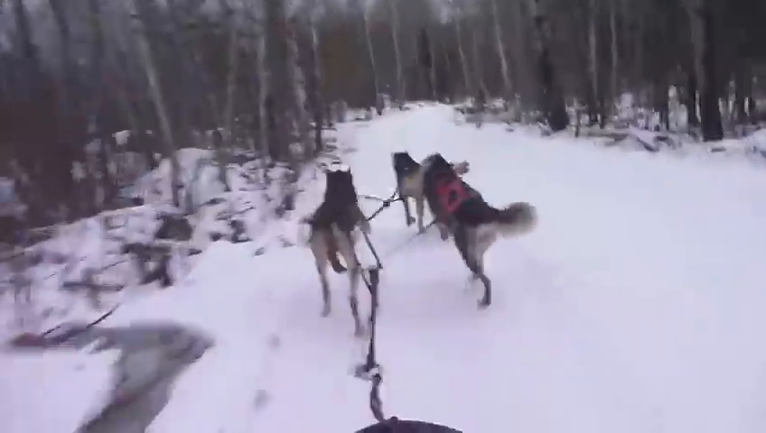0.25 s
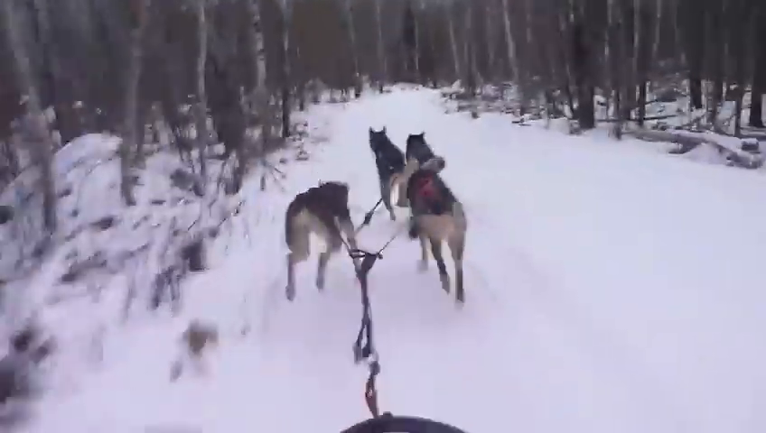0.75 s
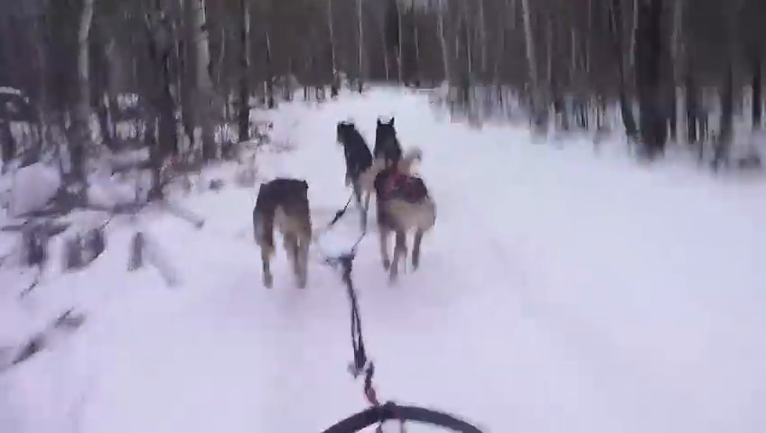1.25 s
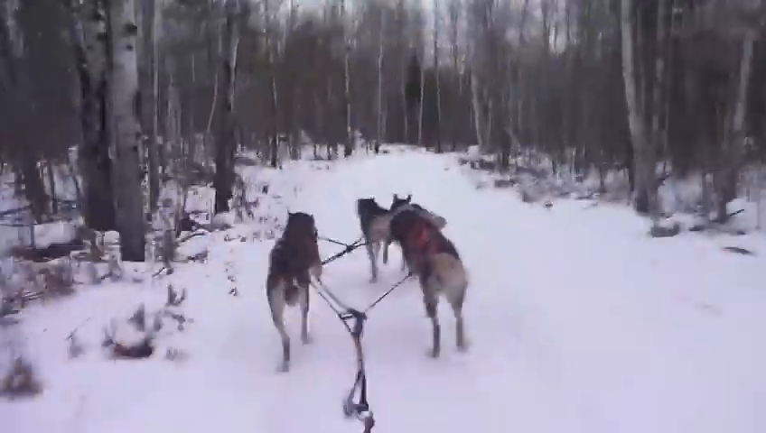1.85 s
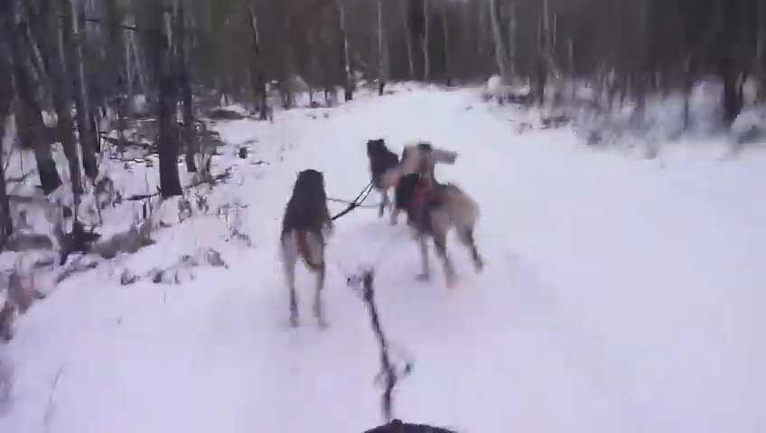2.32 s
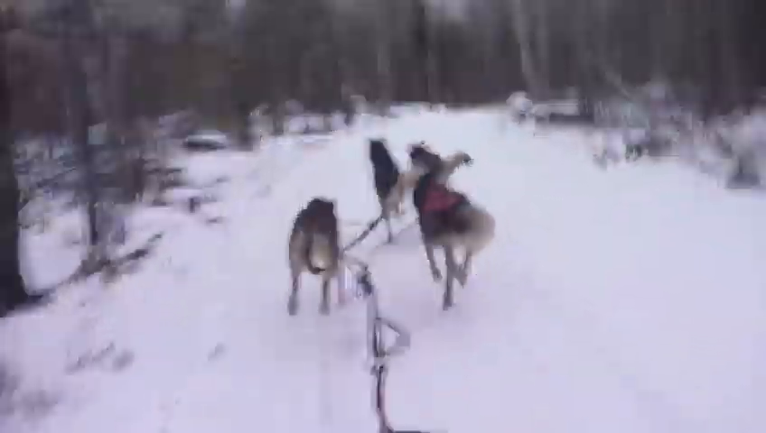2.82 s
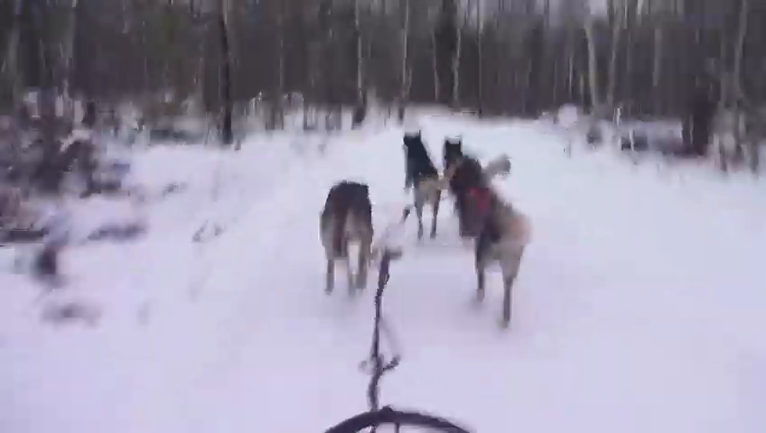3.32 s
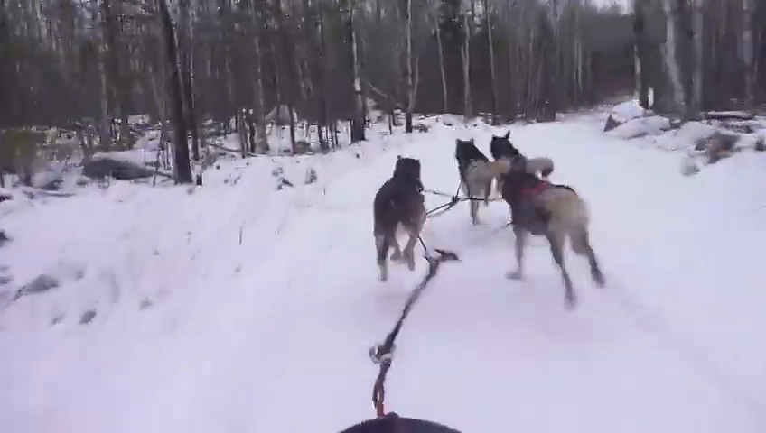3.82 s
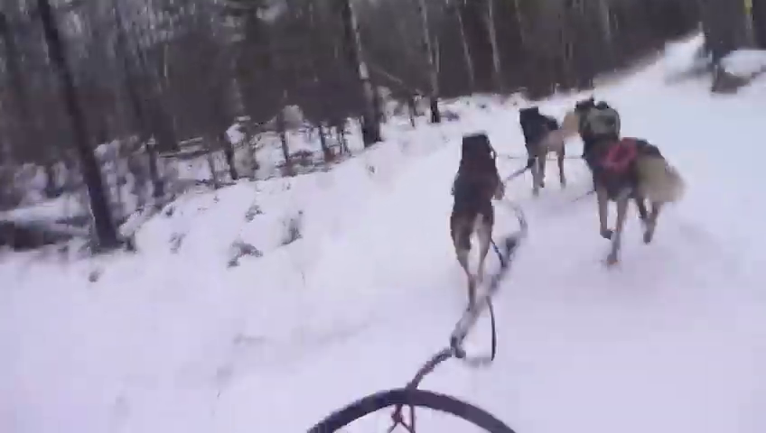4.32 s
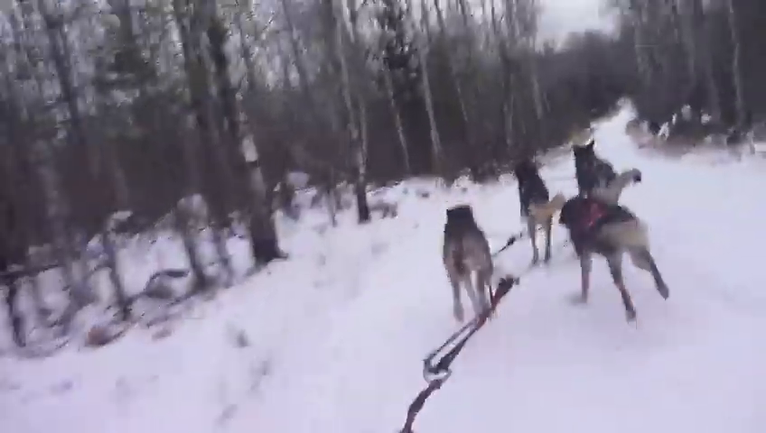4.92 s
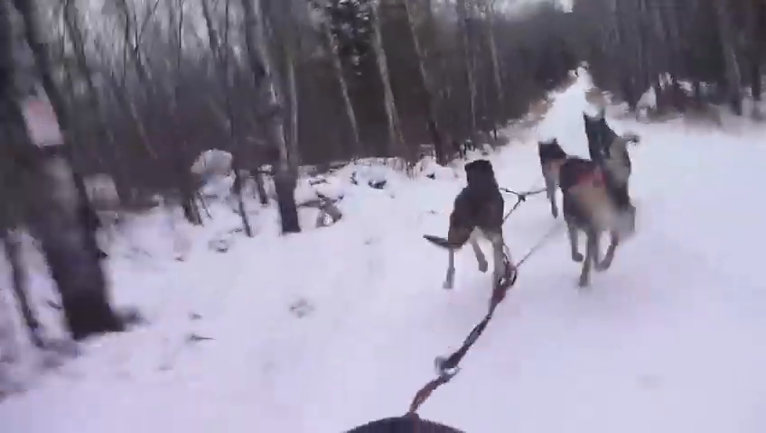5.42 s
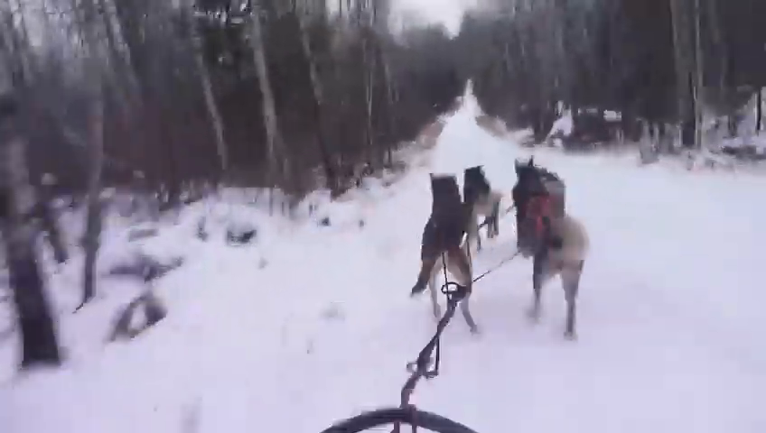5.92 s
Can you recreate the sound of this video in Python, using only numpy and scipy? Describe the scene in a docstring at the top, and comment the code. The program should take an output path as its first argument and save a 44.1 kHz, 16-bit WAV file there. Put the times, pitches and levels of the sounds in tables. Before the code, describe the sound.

Close, dry clatter of a jolting dog-drawn rig: hard knocks, fine rattling and sharp metallic clicks above rolling rumble and faint snow hiss.

```python
"""Loose parts rattle and slam on a wheeled rig that dogs pull along a frozen, rutted snow trail.
Bumps slam the parts into their ringing modes; rough patches shake the rig and the rattle follows the shaking.
Wheels rumble and hiss over packed snow as coloured noise, and the frame thuds softly in short low waves.
Light parts ring on as single fading notes, and small metal fittings click as short high pings.
The camera rides on the frame, so everything is close, dry and mono."""
import sys
import numpy as np
from scipy import signal
from scipy.fft import rfft, irfft
from scipy.io import wavfile
from scipy.ndimage import uniform_filter1d

SR = 44100
rng = np.random.default_rng(int(sys.argv[2]) if len(sys.argv) > 2 else 0)


def master_out(mix):
    """Clip the mix to full scale and print it as 16-bit PCM to the path in sys.argv[1]."""
    frames = np.transpose(np.atleast_2d(mix))
    ceiling = np.clip(frames, -1, 1)
    pcm = np.round(ceiling * 32767).astype(np.int16)
    wavfile.write(sys.argv[1], SR, pcm)


N = 271656
TIME = np.arange(N) / SR
TOP_HZ = 7650  # upper edge of the camera's sound

# Bumps of the trail, hard and light.
# Each row: time of the slam's peak [s], clack level [dB], frame thump relative to the clack [dB].
BUMPS = [(0.02, -13.5, 0), (0.081, -26.5, 5.5), (0.126, -22, 0), (0.161, -17, 1), (0.27, -21.5, 3.5),
         (0.442, -30, -11), (0.577, -27.5, 6.5), (0.623, -31, -22), (0.658, -24.5, -2), (0.673, -22, 5),
         (0.734, -15.5, 0), (0.871, -21.5, -5), (0.93, -18, -4), (1.146, -23.5, -10), (1.241, -16, 0),
         (1.29, -27.5, 4.5), (1.456, -25, 1), (1.479, -14, 1), (1.536, -19, 0), (1.73, -29.5, -4.5),
         (1.855, -14.5, 0), (2.068, -31, 3), (2.101, -18, -2), (2.199, -22, 1), (2.232, -14, -1.5),
         (2.402, -17, 3), (2.553, -18.5, 0.5), (2.628, -20.5, -3), (2.725, -17, 0.5), (2.854, -22, -4),
         (2.904, -20, 1.5), (3.074, -26, 1), (3.208, -21, 1.5), (3.341, -15, -0.5), (3.516, -20.5, 2),
         (3.634, -28, -8), (3.962, -17, -2), (4.074, -23, 1), (4.087, -25, -10), (4.33, -27, 0),
         (4.353, -28.5, -11), (4.524, -16, 0), (4.641, -20, 0.5), (4.956, -18.5, 0.5), (5.106, -18, -2),
         (5.155, -25, -9), (5.21, -16, 1), (5.428, -28.5, 0), (5.468, -15.5, -2), (5.565, -21, 1.5),
         (5.681, -24.5, 0), (5.71, -14, -0.5), (5.88, -20, -4.5), (5.913, -13.5, -3), (6.083, -20.5, -2),
         (6.135, -23, 1)]


def undb(db):
    """Decibels to gain."""
    return 10 ** (np.asarray(db) / 20)


def unit(x):
    """Scale to rms 1."""
    return x / np.sqrt(np.mean(x ** 2) + 1e-18)


def curve(rows):
    """Join (seconds, value) rows by straight lines."""
    return np.interp(TIME, *np.transpose(rows))


def add(out, s, x):
    """Mix x into out, starting at s seconds."""
    i = max(int(s * SR), 0)
    out[i:i + len(x)] += x[:max(N - i, 0)]


def band(x, lo_hz, hi_hz, order=2):
    """Causal band-pass."""
    sos = signal.butter(order, [lo_hz, hi_hz], "band", fs=SR, output="sos")
    return signal.sosfilt(sos, x)


def coloured(points):
    """Noise of rms 1 whose spectrum follows (Hz, dB) points."""
    hz, db = np.transpose(points)
    bin_hz = np.arange(N // 2 + 1) * SR / N
    gain = undb(np.interp(np.log(bin_hz + 1), np.log(hz), db))
    return unit(irfft(rfft(rng.standard_normal(N)) * gain, N))


def walk(rate):
    """Random levels, rate of them per second, joined by ramps and scaled to rms 1."""
    hold = int(SR / rate)
    steps = np.repeat(rng.standard_normal(N // hold + 1), hold)
    return unit(uniform_filter1d(steps, hold)[:N])


def contacts(size, per_s, spread_db):
    """A random train of tiny impacts of uneven strength and either sign."""
    level_db = spread_db * np.clip(rng.standard_normal(size), -2, 2)
    strength = undb(level_db) * rng.choice([-1, 1], size)
    return strength * (rng.random(size) < per_s / SR)


def tap(t, decay_s, first=5):
    """One sharp contact, then a fading chatter of smaller ones."""
    push = unit(contacts(len(t), per_s=6000, spread_db=0.5)) * np.exp(-t / decay_s)
    push[0] = first
    return push


def ring(push, scatter_db, detune=0.057):
    """The damped modes of the loose parts; each point of contact favours and detunes different ones."""
    # Resonances of the loose parts before scatter and detuning.
    # Each row: frequency [Hz], width [Hz], level [dB].
    modes = [(960, 480, -2), (1343, 278, 5), (1580, 125, 1), (2002, 240, 2.5), (2522, 490, 3),
             (3200, 480, -1.5), (3800, 130, -13.5), (5170, 470, -4.5), (6800, 280, -49.5)]
    out = 0
    for (hz, width_hz, db), (favour, shift) in zip(modes, rng.standard_normal((len(modes), 2))):
        resonator = signal.iirpeak(hz * np.exp(detune * shift), hz / width_hz, SR)
        out = out + undb(db + scatter_db * favour) * signal.lfilter(*resonator, push)
    return out


def swell(start_s, length_s, attack_s, release_s):
    """Envelope that rises exponentially to 1, holds and fades exponentially."""
    before = np.maximum(start_s - TIME, 0)
    after = np.maximum(TIME - start_s - length_s, 0)
    return np.exp(-before / attack_s - after / release_s)


def shaking(patch_attack_s=0.0042, patch_release_s=0.0091,
            bump_db=-15, bump_attack_s=.014, bump_release_s=0.018):
    """How hard the rig is shaken, in dB: smooth snow, rough patches and bumps add their power."""
    # Smooth snow beneath the patches. Each row: time [s], shaking [dB].
    smooth_rows = [(0, -40.5), (1.3, -47.5), (1.66, -48.5), (2.0, -43.5), (2.8, -49.5), (3.8, -44.5),
                   (5.2, -42.5), (6.16, -40.5)]
    # Rough patches of the trail. Each row: start [s], length [s], shaking [dB].
    patch_rows = [(0.079, 0.054, -27), (0.325, 0.13, -34.0), (0.559, 0.13, -29.5), (0.866, 0.088, -35.5),
                  (1.015, 0.026, -28), (1.123, 0.065, -31), (1.29, 0.13, -37.0), (1.45, 0.12, -33.5),
                  (1.797, 0.086, -30.5), (2.181, 0.081, -32), (2.325, 0.045, -38.5), (2.492, 0.014, -30),
                  (2.573, 0.17, -35.5), (2.829, 0.089, -33), (2.99, 0.11, -39.5), (3.141, 0.14, -33.5),
                  (3.449, 0.086, -32.5), (3.627, 0.098, -38.5), (3.904, 0.2104, -36), (4.435, 0.11, -28),
                  (4.578, 0.08, -33.5), (4.899, 0.22, -38.5), (5.052, 0.19, -35.5), (5.362, 0.17, -37.5),
                  (5.633, 0.048, -36.5), (5.82, 0.12, -32.0), (6.075, 0.078, -37.5)]
    power = undb(curve(smooth_rows)) ** 2
    for s, length_s, db in patch_rows:
        power = power + (undb(db) * swell(s, length_s, patch_attack_s, patch_release_s)) ** 2
    for s, clack_db, _ in BUMPS:
        power = power + (undb(clack_db + bump_db) * swell(s, 0, bump_attack_s, bump_release_s)) ** 2
    return 10 * np.log10(power)


def rattle(shake_db, gap_s=.012, decay_s=0.0018, spread_db=3.5,
           taps_db=1, grit_db=-6, frame_db=-3, rest_db=-46):
    """Small rebounds follow each other at uneven gaps, with spurts of fine grit; each also nudges the frame."""
    taps, nudges = np.zeros(N), np.zeros(N)
    t = TIME[:int(.02 * SR)]
    starts = np.cumsum(rng.gamma(2, gap_s / 2, size=1500))
    for s in starts[starts < TIME[-1]]:
        strength = undb(spread_db * min(rng.standard_normal(), 1))
        push = tap(t, decay_s)
        add(taps, s, strength * unit(ring(push, scatter_db=5.0)))
        add(nudges, s, strength * unit(push))
    grains = ring(contacts(N, per_s=3000, spread_db=6), scatter_db=0, detune=0)
    grit = unit(grains * undb(4 * walk(45)))
    clatter = band(undb(taps_db) * unit(taps) + undb(grit_db) * grit, 770, 3650, order=1)
    drumming = undb(frame_db) * unit(band(nudges, 222, 525, order=3))
    # on smooth snow the parts stay seated and the clatter dies away
    bouncing = 1 / (1 + undb(2 * (rest_db - shake_db)))
    return undb(shake_db) * (bouncing * clatter + drumming)


def wheels(shake_db, hiss_db=-26.5, hiss_follow=0.16, rumble_follow=0.25, lumps_db=5):
    """Lumpy rolling rumble and a smoother hiss of snow; both grow a little where the trail is rough."""
    # Gain of the rumble before lumps and shaking. Each row: time [s], gain [dB].
    roll_rows = [(0, -31), (1.2, -33.5), (2.4, -33.5), (2.9, -36), (3.8, -36), (4.4, -33), (4.8, -36.5),
                 (6.16, -31.5)]
    # Colour of the rolling noise. Each row: frequency [Hz], relative level per hertz [dB].
    colour_rows = [(15, -8.5), (28, 0.5), (50, 1), (85, 2.5), (125, -1.5), (200, -7), (360, -14.5),
                   (580, -11.5), (740, -24), (1400, -28), (2500, -36), (4000, -37.5), (7000, -49.5)]
    rolling = coloured(colour_rows)
    low = signal.sosfiltfilt(signal.butter(2, 270, fs=SR, output="sos"), rolling)
    lumps = lumps_db * np.tanh(walk(32))
    roughness = rumble_follow * (shake_db - shake_db.mean())
    rumble = low * undb(curve(roll_rows) + lumps + roughness)
    hiss = (rolling - low) * undb(hiss_db + hiss_follow * shake_db)
    return rumble + hiss


def knock(thump_db, slam_s, lift_db=-15, settle_db=-23, decay_s=0.0017, settle_s=0.014, first_touch=5,
          frame_lo_hz=155, frame_hi_hz=490, treble_db=-6, treble_spread_db=2.7, heave_db=-13):
    """Parts tap as they lift, slam down at slam_s and settle; the slam rocks the frame for a cycle or two."""
    knock_s, clack_s = .05, .005
    t = TIME[:int(knock_s * SR)]
    after = np.maximum(t - slam_s, 0)
    lift = np.roll(tap(t, decay_s), int(rng.uniform(.003, .006) * SR))
    # a sharp first touch; the contact force peaks just after it
    blow = (1 + 3 * after / decay_s) * np.exp(-after / decay_s)
    settling = undb(settle_db) * np.exp(-after / settle_s)
    force = (after > 0) * (blow + settling)
    slam = force * unit(contacts(len(t), per_s=9000, spread_db=2.5))
    slam[int(slam_s * SR)] = first_touch
    sound = ring(undb(lift_db) * lift + slam, scatter_db=1.0)
    clack = unit(band(sound, 720, 3980, order=3))
    treble_gain = undb(treble_db + treble_spread_db * rng.standard_normal())
    treble = treble_gain * unit(band(sound, 4560, TOP_HZ, order=3))
    shove = after * np.exp(-after / 0.00025)
    heave = undb(heave_db) * unit(band(shove, 65, 169))
    thump = unit(band(shove, frame_lo_hz, frame_hi_hz, order=3)) + heave
    # the level counts the clack's energy as if it all lay within clack_s
    return (clack + treble + undb(thump_db) * thump) * np.sqrt(clack_s / knock_s)


def knocks(rise_s=0.0018, slam_s=.008):
    """Every bump throws the loose parts; the slam starts just before its peak."""
    out = np.zeros(N)
    for s, db, thump_db in BUMPS:
        add(out, s - rise_s - slam_s, undb(db) * knock(thump_db, slam_s))
    return out


def thuds(cycles=0.65):
    """The frame heaves over a hollow for about two cycles, a cosine under a bell-shaped envelope."""
    # Soft thuds of the frame. Each row: time of the middle [s], pitch [Hz], peak [dB].
    thud_rows = [(0.026, 110, -25), (0.54, 79, -24.5), (1.476, 110, -19), (1.612, 79, -16),
                 (1.971, 118, -21), (2.285, 162, -20.5), (2.371, 82, -18.5), (2.427, 71, -21.5),
                 (5.21, 104, -18), (5.775, 111, -18)]
    out = np.zeros(N)
    for s, hz, db in thud_rows:
        turns = (TIME - s) * hz
        bell = np.exp(-np.minimum((turns / cycles) ** 2, 20))
        out -= undb(db) * np.cos(2 * np.pi * turns) * bell
    return out


def plinks(decay_s=0.004):
    """A light part bounces free, so its one note lasts a little longer."""
    # Single parts that ring on alone. Each row: start [s], pitch [Hz], level at the onset [dB].
    plink_rows = [(0.62, 1400, -16), (1.99, 2200, -27), (4.35, 1330, -26), (5.996, 1356, -24.5)]
    out, t = np.zeros(N), TIME[:int(.05 * SR)]
    for s, hz, db in plink_rows:
        add(out, s, undb(db) * np.sin(2 * np.pi * hz * t) * np.exp(-t / decay_s))
    return out


def click(metal_hz=6600, swell_s=0.00027, rebound_s=.0009, rebound_db=-7, body_db=-14, jar_s=.003):
    """A fitting rings for a few cycles, rebounds once and jars the parts around it; peak near 1."""
    t = TIME[:int(.025 * SR)]
    hz = metal_hz * (1 + 0.014 * rng.standard_normal())
    ping = np.sin(2 * np.pi * hz * t) * t / swell_s * np.exp(1 - t / swell_s)
    rebound = np.roll(ping, int(rebound_s * rng.uniform(.7, 1.3) * SR))
    jar = band(ring(tap(t, jar_s), scatter_db=5.5), 1600, TOP_HZ, order=1)
    return ping + undb(rebound_db) * rebound + undb(body_db) * jar


def clicks(shake_db, jingle_per_s=7, jingle_db=10.5, jingle_spread_db=5.5):
    """The fittings snap now and then, and jingle faintly in between as hard as the rig shakes."""
    # Metal fittings snapping against their stops. Each row: start [s], approximate peak [dB].
    snap_rows = [(0.806, -7), (1.0784, -10.5), (1.5228, -8), (1.8727, -4.5), (2.5782, -5), (2.941, 2.5),
                 (2.992, -5), (3.036, -15), (3.1411, -2.5), (3.333, -14.5), (3.5534, -1.5), (3.6531, -17),
                 (4.0695, -13), (4.576, -13), (4.6377, -7.5), (4.655, -12), (5.932, -12.5)]
    snaps, jingle = np.zeros(N), np.zeros(N)
    for s, db in snap_rows:
        add(snaps, s, undb(db) * click())
    starts = np.cumsum(rng.exponential(1 / jingle_per_s, size=100))
    for s, chance in zip(starts, rng.standard_normal(len(starts))):
        add(jingle, s, undb(jingle_spread_db * min(chance, 1)) * click())
    return snaps + undb(shake_db + jingle_db) * jingle  # jingle_db is relative to the shaking


def scene():
    """Everything reaches the camera through the frame: close, dry and mono."""
    shake_db = shaking()
    rolling_rig = rattle(shake_db) + wheels(shake_db)
    blows = knocks() + thuds()
    small_parts = plinks() + clicks(shake_db)
    return (rolling_rig + blows + small_parts)[None]


def record(dry, notch_hz=2900, notch_width_hz=260, ceiling=1.5):
    """The camera has a narrow notch in the upper mids, rounds peaks towards a ceiling and cuts the top."""
    notched = signal.lfilter(*signal.iirnotch(notch_hz, notch_hz / notch_width_hz, SR), dry)
    rounded = notched / (1 + (notched / ceiling) ** 6) ** (1 / 6)
    top_cut = signal.ellip(8, .3, 65, TOP_HZ, fs=SR, output="sos")
    return signal.sosfilt(top_cut, rounded)


dry = scene()
out = record(dry)
master_out(out)
```